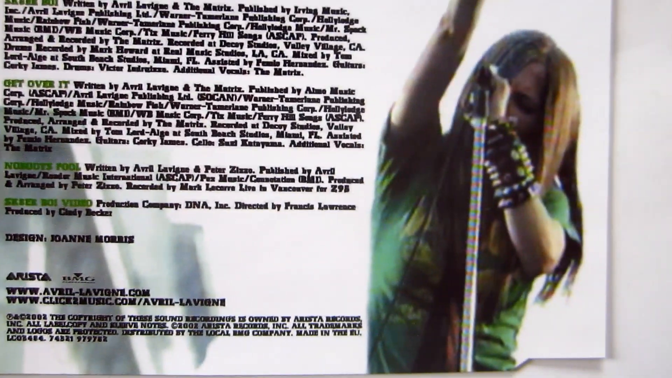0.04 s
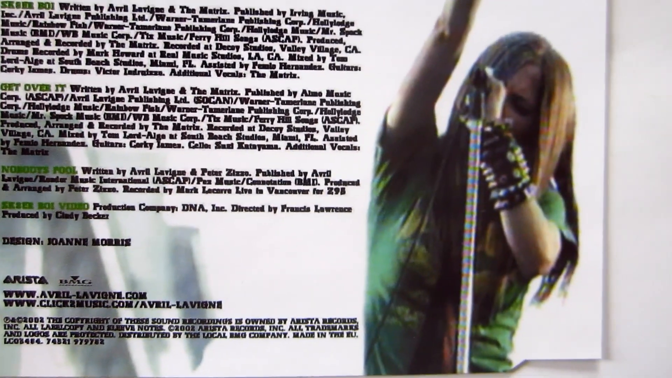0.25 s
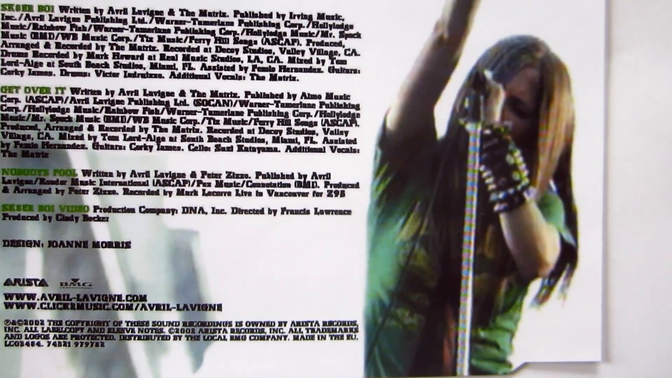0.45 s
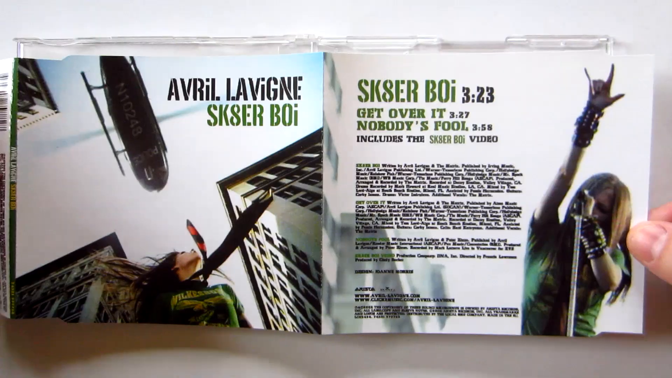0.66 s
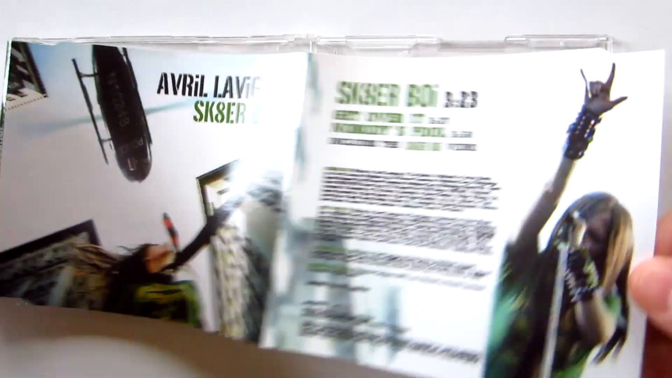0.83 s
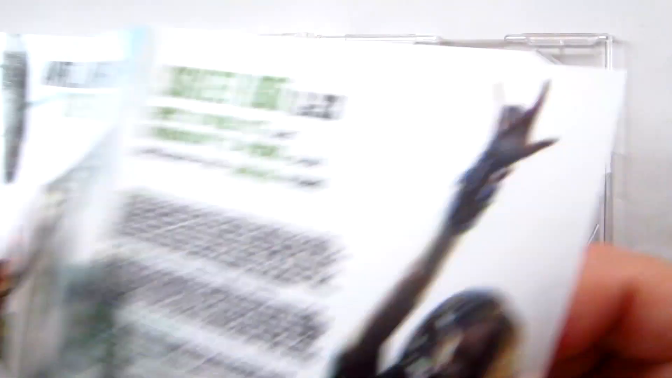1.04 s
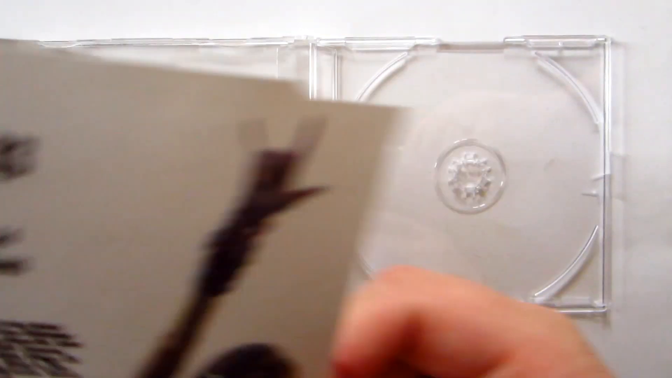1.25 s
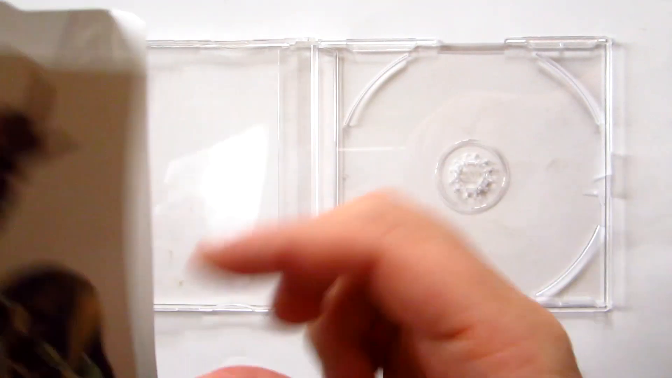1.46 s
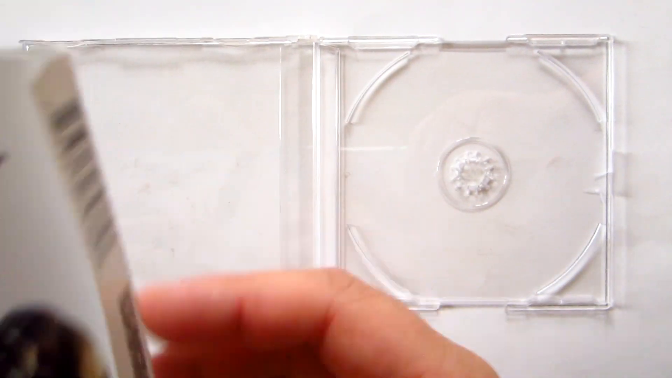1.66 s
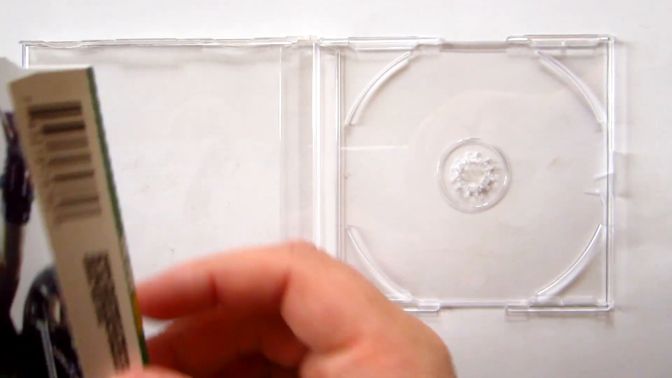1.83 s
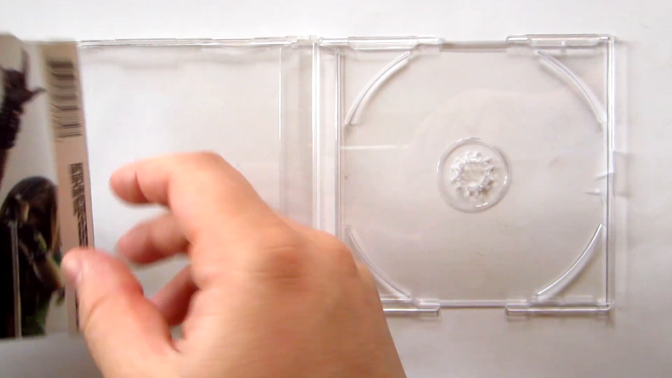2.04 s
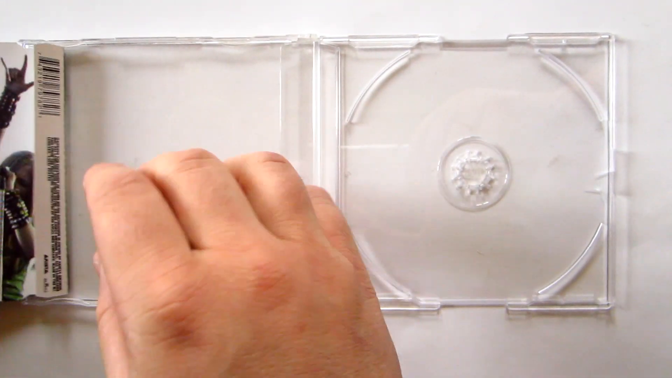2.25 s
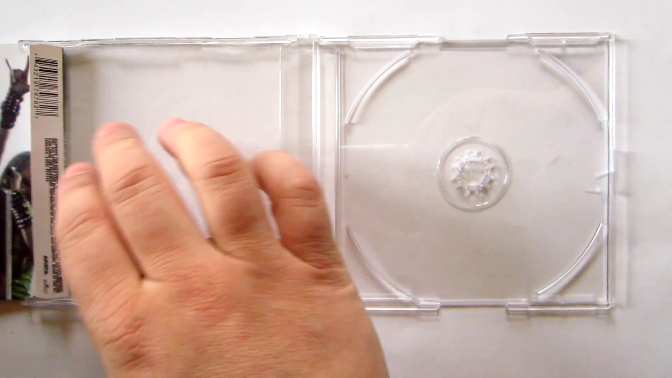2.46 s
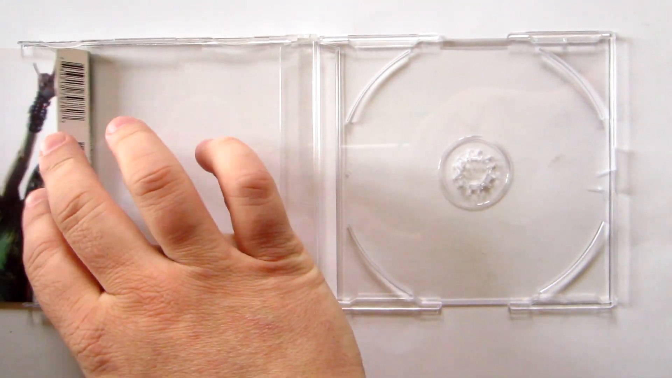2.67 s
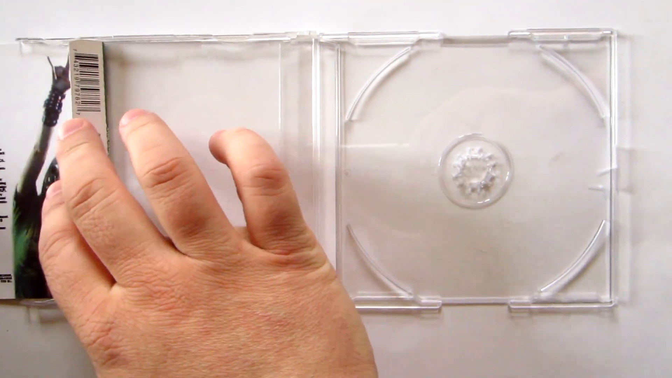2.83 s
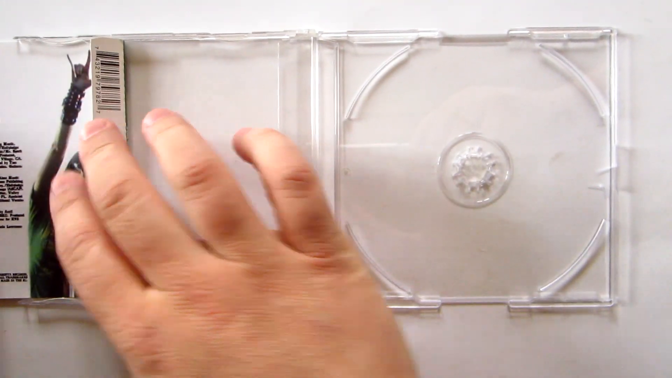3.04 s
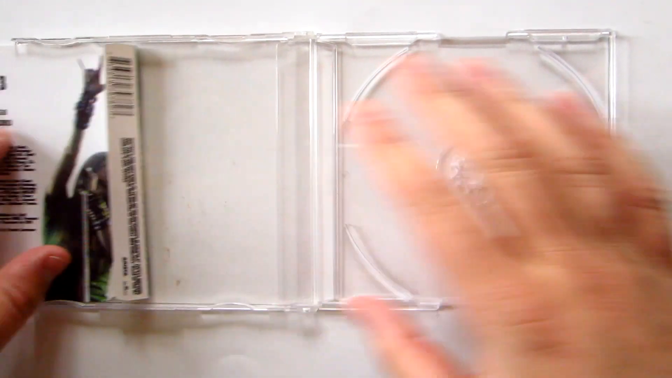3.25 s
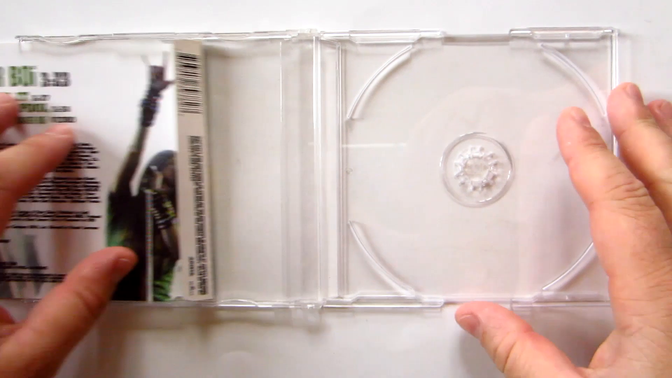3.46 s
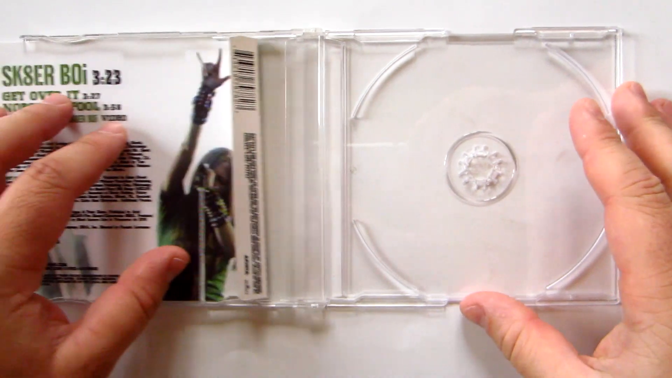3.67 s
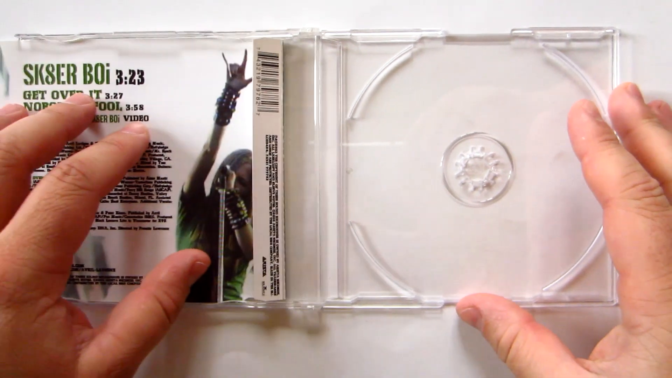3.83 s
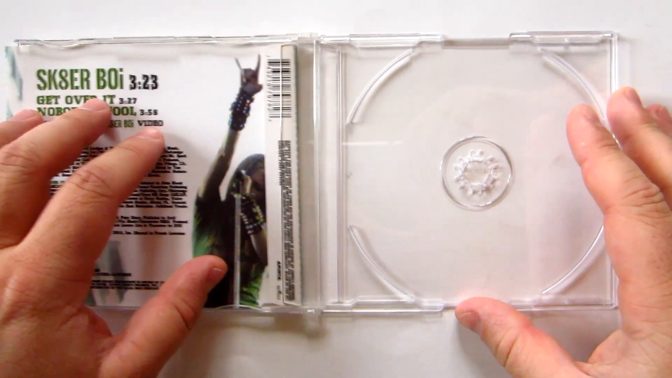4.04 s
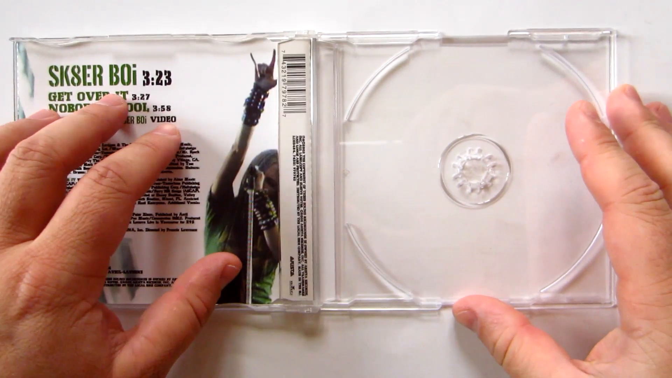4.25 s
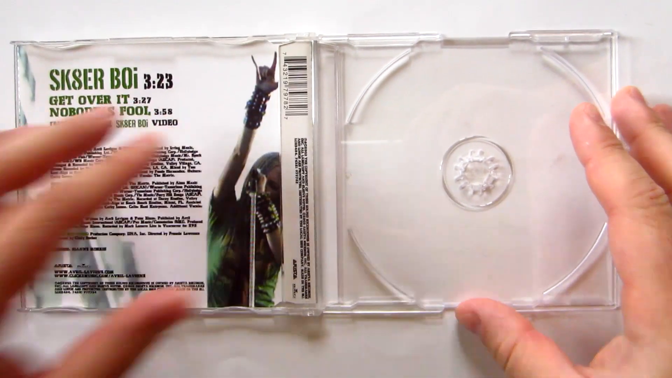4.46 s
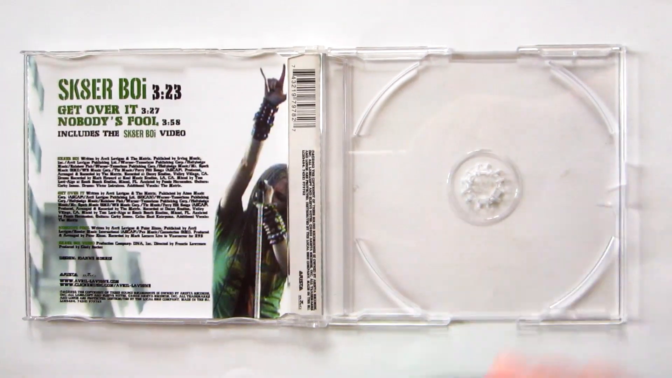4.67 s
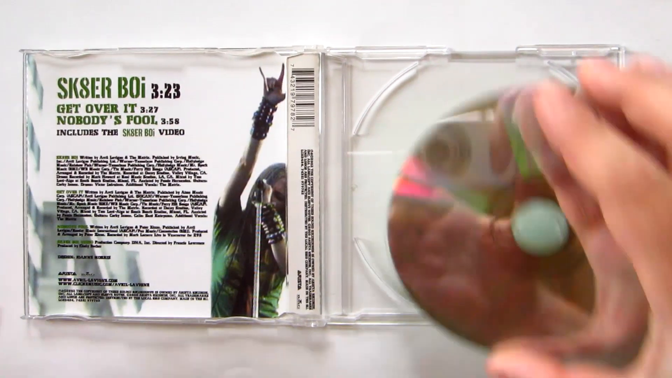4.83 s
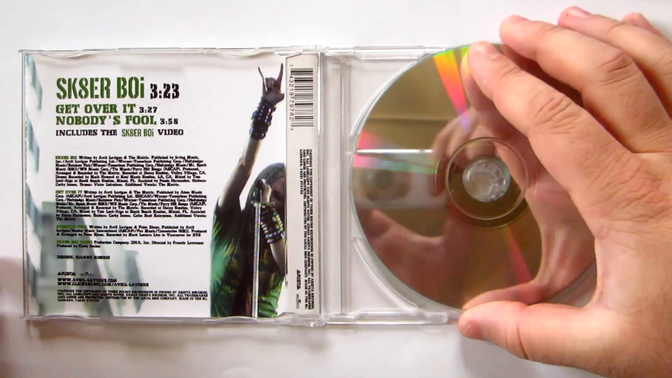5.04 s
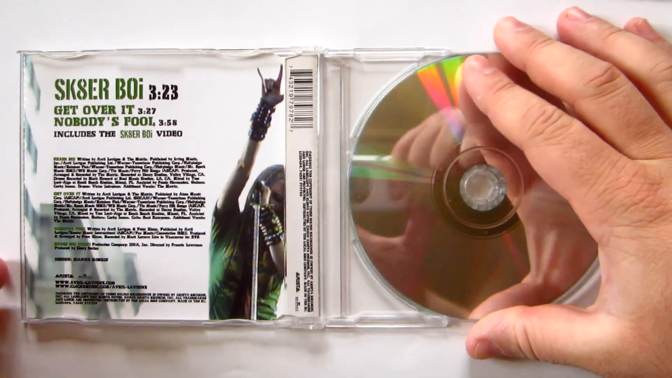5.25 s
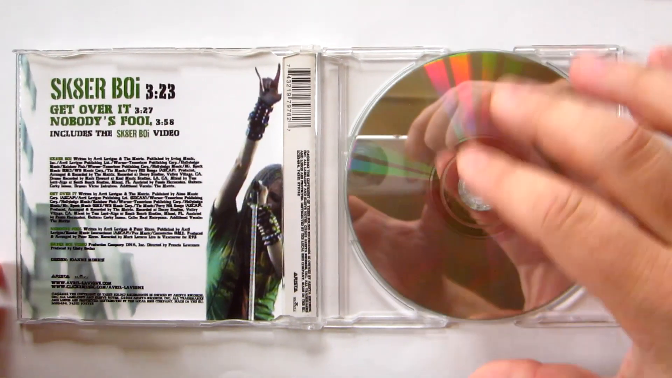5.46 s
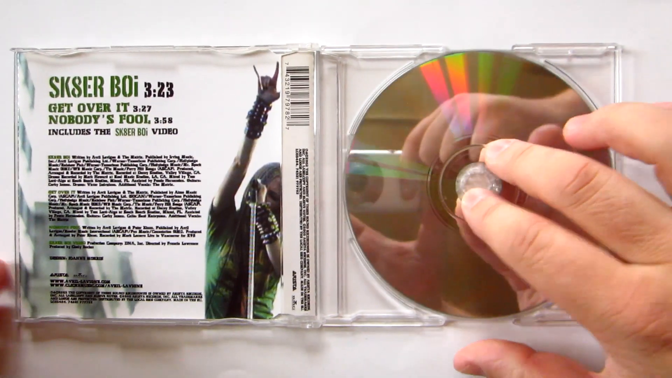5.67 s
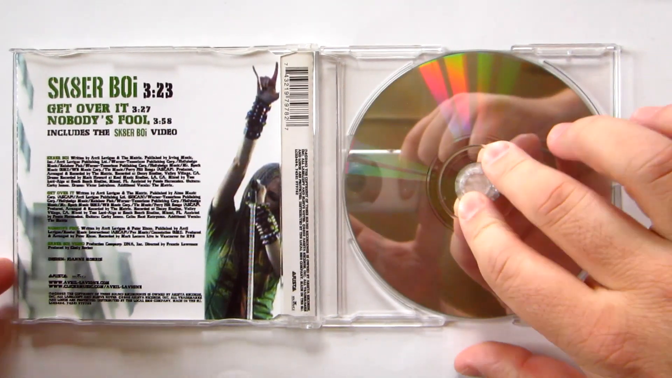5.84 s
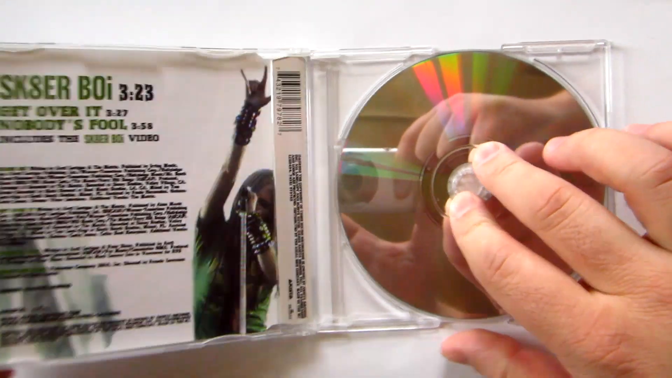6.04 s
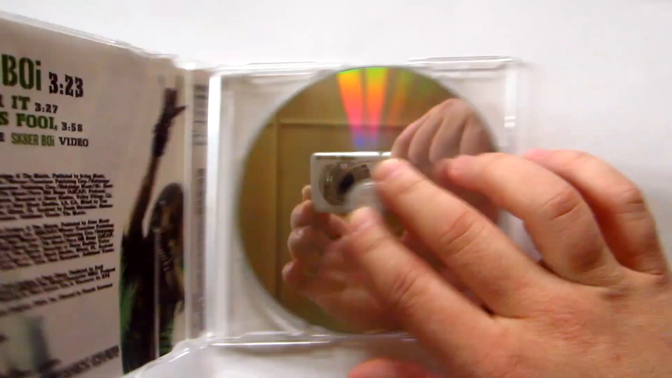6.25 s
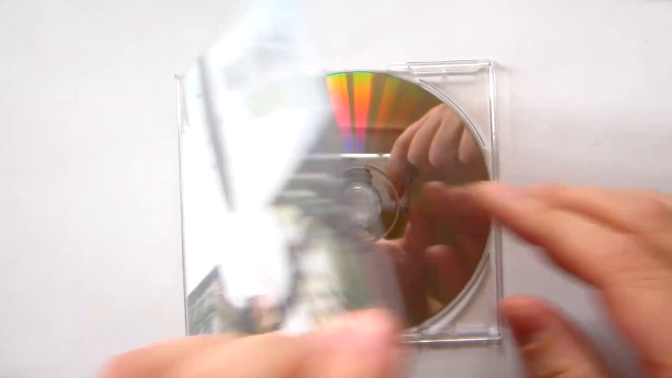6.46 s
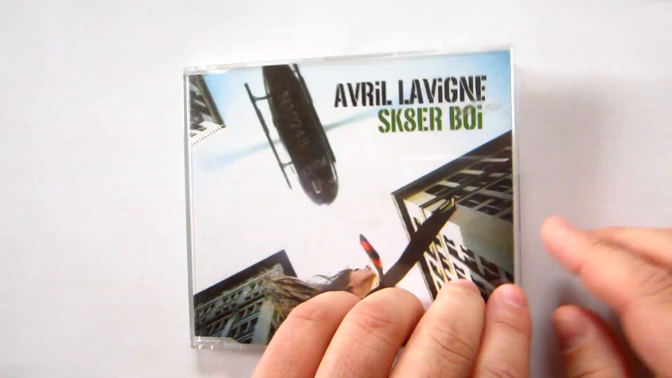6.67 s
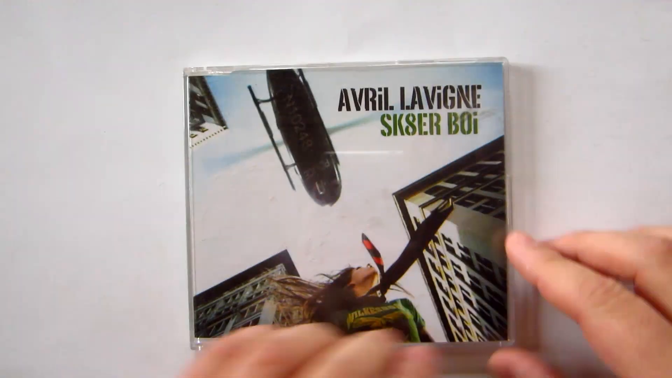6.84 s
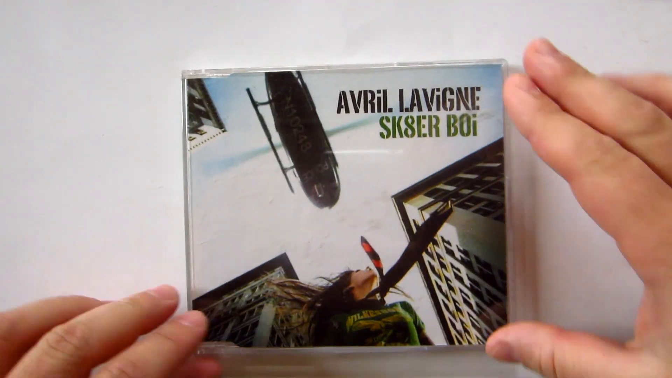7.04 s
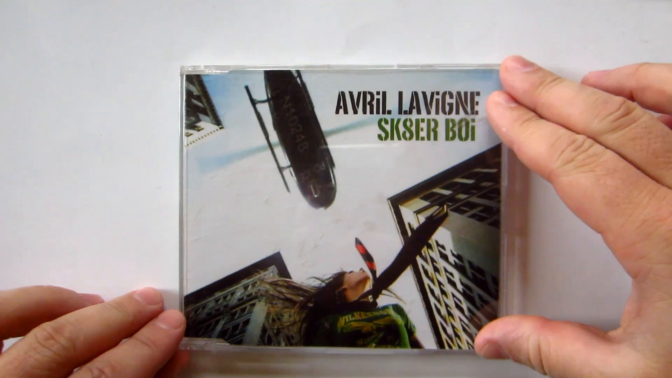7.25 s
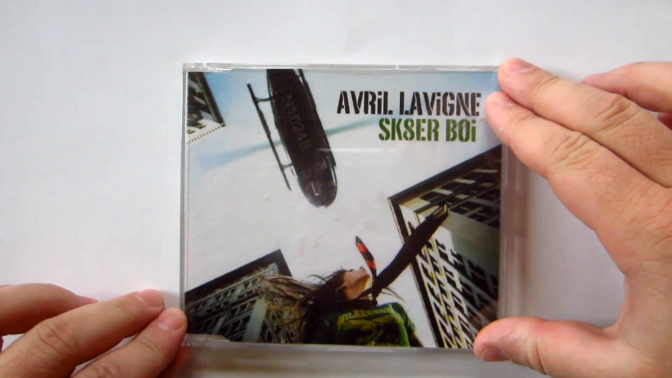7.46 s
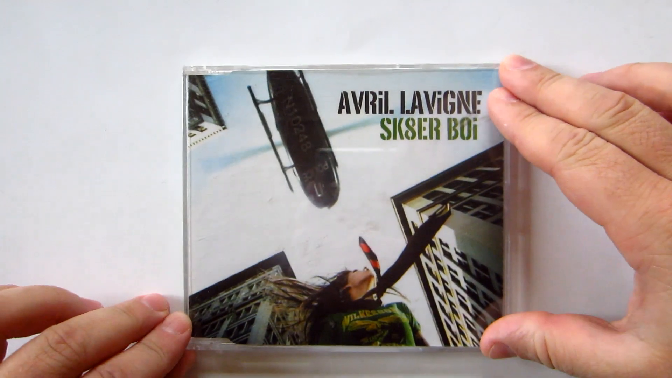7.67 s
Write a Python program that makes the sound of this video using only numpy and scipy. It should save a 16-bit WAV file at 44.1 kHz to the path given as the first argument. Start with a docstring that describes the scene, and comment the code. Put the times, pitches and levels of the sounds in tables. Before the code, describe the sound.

A quiet, dry room with faint rumble and hiss, heard close over a table. The level drops out from about 0.55 to 0.7 seconds. At 0.85-0.92 hard plastic clicks burst out, running into a rough, jerky creak until 1.05. Duller knocks come at 1.14, a short rasp at 1.25 and a click at 1.33. Soft paper rubs and small ticks continue, with clearer clicks near 2.2 and 2.28, and a brushing swell around 3.0. From 3.3 to 4.3 the insert slides in uneven, gradually duller swishes with tiny squeaks. At 5.05-5.3 the disc taps its tray in a quick cluster; a sharp press clicks at 5.7. From 6.05 to 6.4 the case scrapes round, with low thuds and a brief squeak. Bright clicks and a bump land at 6.82, light scrapes and clicks at 7.2-7.3, then a loud, crisp snap at 7.38 and a faint last rub.

```python
"""A thin plastic disc case is packed by hand on a table: filtered impulses and chatter click its shell,
friction noise drags it round as the lid swings over, and a burst of five contacts snaps the catch home.
The paper insert creaks, rasps and slides on stick-slip noise; the disc taps and scuffs its tray.
Short gliding squeaks, soft table thuds, a faint room tail, rumble and hiss lie around them.
The level drops out briefly near the start."""
import sys
import numpy as np
from scipy import signal
from scipy.fft import rfft, irfft, next_fast_len
from scipy.io import wavfile
from scipy.ndimage import uniform_filter1d

SR = 44100
rng = np.random.default_rng(int(sys.argv[2]) if len(sys.argv) > 2 else 0)


def bounce(signal):
    """Save signal as a 16-bit WAV file at the path given by the first command-line argument."""
    frames = np.transpose(np.atleast_2d(signal))
    limited = np.clip(frames, -1, 1)
    pcm = np.round(limited * 32767).astype(np.int16)
    wavfile.write(sys.argv[1], SR, pcm)


N = 339863
TIME = np.arange(N) / SR  # s
RING = TIME[:SR // 10]  # s, the time axis of one short sound

# Levels in the tables are relative; most layers also have a mix gain.
# "Knock" or "body" is the low register and "snap" or "hiss" the high one, both against the middle.

# room rumble and microphone hiss: hz, gain_db
FLOOR_TONE = [(12, -45), (20, -3.5), (60, -3), (113, -4), (270, -8), (310, -8), (542, -11.5), (1000, -15.5),
              (1220, -16), (3250, -20.5), (7730, -24.5), (16000, -35.5)]
# reverberation time of the room: hz, t60_s
ROOM_DECAY = [(200, 0.19), (2500, 0.2), (6000, 0.17), (14000, 0.22)]
# overall gain, with the dropout near the start: time_s, gain_db
DROPOUT = [(.533, 2), (.546, -41), (.6, -48), (.7, -42), (.712, 3)]
# soft bumps of hands and case on the table: start_s, level_db, resonance_hz
BUMPS = [(1.143, -40, 342), (1.383, -33.5, 107), (1.406, -44, 240), (4.633, -43, 147), (5.266, -40.5, 308),
         (6.28, -38.5, 130), (6.335, -32.5, 91), (6.405, -32.5, 89), (6.428, -37, 121), (6.823, -29.5, 240),
         (6.842, -37.5, 240), (7.384, -39, 320)]
# brief squeaks of sliding paper and plastic: middle_s, level_db, pitch_hz, glide_octaves_per_s, length_s
SQUEAKS = [(3.333, -44, 11300, 12, .008), (3.513, -47, 11200, 6, .011), (3.755, -48, 5420, 1, .017),
           (4.008, -50, 3750, -4, 0.012), (5.781, -49, 3700, -1, .012), (6.323, -36.5, 2610, -.5, .032)]

# the disc meeting the tray and its hub: start_s, level_db, knock_db, snap_db, resonance_hz
DISC_TAPS = [(5.026, -34.5, -7, -8, 3500), (5.065, -17, -7, -4.5, 4970), (5.1802, -21, -13, -9, 2680),
             (5.202, -16, -18, -15, 3000), (5.2101, -18, -8.5, -8.5, 3060), (5.266, -12.5, -8, -10.5, 3050),
             (5.2852, -19.5, -15, -9.5, 3020), (5.3285, -32.5, -5, 0, 5660), (5.6566, -32, -11, -7, 2800),
             (5.691, -13, -26, -7, 3100), (5.711, -25.5, -13, -7, 3200), (5.74, -29, -7, -9, 3720),
             (5.8288, -35.5, -9, -16, 3500)]
# the disc scuffing its tray: peak_s, rub_db, body_db, length_s
DISC_SCUFFS = [(5.258, -46.5, 0, 0.14), (5.67, -52, -16, .035), (5.715, -47.5, -1.5, .075),
               (5.781, -44, -30, 0.039)]
# colour of disc on tray: hz, gain_db
DISC_TONE = [(88, -58), (150, -24), (589, -26), (1260, -7), (1900, -7.5), (3040, 1.5), (4160, -8.5),
             (5050, -10), (6260, -13.5), (6770, -20), (10400, -26.5), (11700, -28), (16000, -49)]
# resonances of the tray: centre_hz, width_hz, gain_db
TRAY_MODES = [(1380, 150, -2), (2200, 180, -18), (2760, 140, -1), (3200, 630, 10), (3700, 290, -19),
              (4400, 400, -17)]

# the insert sticking and slipping on the lid: time_s, level_db
CREAK_LEVEL = [(.932, -33), (.944, -24), (.975, -23.5), (1.01, -24.5), (1.034, -24), (1.05, -40),
               (1.07, -50)]
# the insert's edge rasping past a tab: time_s, level_db
RASP_LEVEL = [(1.2505, -41), (1.252, -27), (1.267, -29.5), (1.283, -32), (1.293, -31), (1.298, -49)]
# strokes of paper on plastic: peak_s, rub_db, body_db, length_s
PAPER_STROKES = [(.83, -50.5, -4, 0.1), (1.075, -47, -1.5, 0.1), (1.15, -42, 10.5, 0.044),
                 (1.185, -45, -1, 0.15), (1.305, -42, -7, 0.1), (1.375, -61.5, 8.5, .13),
                 (1.785, -61, -14, 0.067), (2.045, -55.5, -3, 0.16), (2.21, -44, -2.5, 0.051),
                 (2.3, -51.5, -2, 0.17), (2.55, -53.5, -6, 0.33), (2.645, -51, -8, .05),
                 (2.765, -50.5, -13, 0.14), (2.858, -42, -10, .13), (2.995, -36.5, -14.5, 0.083)]
# the insert pushed home under the tabs: time_s, rub_db
SLIDE_HOME = [(3.27, -78), (3.312, -46), (3.422, -45), (3.482, -56), (3.53, -43.5), (3.576, -52),
              (3.67, -48.5), (3.728, -56), (3.752, -45.5), (3.818, -55), (3.894, -54.5), (3.9, -47),
              (3.924, -60), (4.004, -45.5), (4.05, -62.5), (4.112, -36), (4.126, -42.5), (4.32, -66)]
# colours of the creak, the rasp and sliding paper: hz, gain_db
CREAK_TONE = [(88, -74), (150, -37), (291, -28), (354, -6.5), (475, -31.5), (566, -10), (888, -16.5),
              (1290, -7), (1530, -23), (2270, 2.5), (2760, 0.5), (8560, -30), (14500, -36), (16000, -48)]
RASP_TONE = [(120, -67), (200, -42), (491, -25), (722, -15.5), (3560, -11.5), (3830, 1.5), (4120, -16),
             (4520, -7), (7140, -16.5), (13100, -18.5), (16000, -39)]
PAPER_TONE = [(180, -61), (300, -12.5), (455, -15.5), (713, -12), (1080, -8.5), (1480, -11), (1900, -4.5),
              (3290, -2), (3700, 1.5), (5430, -1.5), (7320, -6), (11500, -6.5), (16000, -19)]

# hard contacts on the case: start_s, level_db, knock_db, snap_db, resonance_hz
CASE_CLICKS = [(0.8444, -23.5, -14, -21, 2150), (.869, -20.5, -10, -17, 1800), (.877, -18, -9, -12, 1590),
               (0.9054, -11, -13, -22, 3570), (0.9117, -3, -15, -14.5, 3600), (0.9157, -9.5, -6, -16, 1380),
               (1.135, -27, 3, -11, 1380), (1.1435, -20, 8, -10, 1230), (1.1525, -21.5, 5, -8, 750),
               (1.266, -14.5, -15, -21, 3970), (1.3338, -23, -9, -0.5, 3850), (1.9736, -37.5, -2, -1, 3230),
               (2.0102, -37.5, -2, -7, 4030), (2.1945, -16.5, -6, -4, 4100), (2.272, -31, -9, -13, 4520),
               (2.2812, -19, -1, -5, 4840), (2.5767, -29, -5, -10, 2410), (2.6348, -33.5, -9, -2, 4350),
               (2.7937, -25.5, -8, 5, 2760), (2.89, -25, -11.5, -15, 4150), (3.0981, -33.5, -2, -2, 4400),
               (3.6625, -30, -25, -7, 3680), (3.9009, -30, -17, -10, 4150), (4.5595, -33, -4, -1, 2540),
               (6.8209, -16, -3, 3.5, 5250), (6.8252, -16, -7.5, -11, 2200), (6.8345, -21, -9, 2, 5050),
               (7.2604, -33.5, -10, -12, 2200), (7.2909, -18, -11, -8, 5920)]
# the hardest slips of the creaking insert: start_s, level_db
CREAK_SLIPS = [(0.9454, -11), (.9487, -12), (0.962, -14.5), (0.9714, -11), (0.9887, -13), (0.9945, -9.5),
               (1.0023, -11.5), (1.0117, -10.5)]
# the catch snapping home: start_s, level_db, knock_db, snap_db, base_t60_s, resonance_hz
CATCH_SNAP = [(7.3788, -13, -8, -14, 0.035, 5500), (7.381, -14, -6, -2, 0.012, 4800),
              (7.3828, -3, -11, -9, 0.0058, 3880), (7.3842, -2, -18, -12.5, 0.0081, 2370),
              (7.3857, -7.5, -12, -15, 0.018, 1950)]
# the case shifted on the table: peak_s, rub_db, body_db, length_s
CASE_DRAGS = [(6.595, -51, -6, 0.2), (6.75, -53.5, -6, 0.12), (6.795, -40.5, -6.5, 0.054),
              (6.84, -49, 0, 0.075), (7.212, -42, -15.5, 0.067), (7.305, -50, -13, 0.24),
              (7.64, -53.5, -4, 0.12)]
# the case pulled round as the lid swings over: time_s, rub_db, body_db, hiss_db
LID_SWING = [(6.02, -63.5, 6, -10), (6.064, -46.5, -14, -7.5), (6.142, -48, -14, -6),
             (6.146, -49.5, -15, 3.5), (6.176, -37.5, -9.5, -5), (6.234, -34, -13.5, -2.5),
             (6.3, -35.5, -10, -3), (6.304, -33, -15, -7), (6.352, -34.5, -11, -7), (6.42, -56, -1, -11)]
# colours of the clicks, the catch and the dragged case: hz, gain_db
CLICK_TONE = [(88, -36), (150, -15.5), (291, -10.5), (475, -18.5), (702, 2), (1390, 4.5), (2920, -2.5),
              (3550, -1), (4950, -3.5), (5360, -8.5), (7770, -8), (12200, -18.5), (14200, -23),
              (16000, -45)]
CATCH_TONE = [(150, -25), (400, -23), (750, -21), (1150, -5.5), (1500, -13), (2000, -2), (3600, -3.5),
              (5500, -3.5), (10000, -13), (16000, -25)]
DRAG_TONE = [(180, -51), (300, -18), (667, -13), (814, -6), (1390, -2), (1580, -4.5), (2570, -1),
             (3400, -6), (5430, -6), (10000, -6.5), (13500, -11), (16000, -25)]
# resonances of the lid, the closed case and the shell under rubbing: centre_hz, width_hz, gain_db
LID_MODES = [(394, 28, -16.5), (764, 35, -9), (1276, 59, -4), (1590, 16, -13), (2520, 29, 0),
             (2760, 38, -1), (3210, 53, -3), (3400, 18, -7.5), (3780, 33, -0.5), (4360, 68, -14.5),
             (4970, 32, -13.5), (5200, 47, -14)]
CLOSED_MODES = [(1120, 120, -10), (1950, 260, -5), (2370, 84, -12), (2950, 83, -15), (3600, 130, -10),
                (4970, 55, -7), (4840, 58, -13), (5530, 63, -9), (5970, 120, -7)]
SHELL_MODES = [(766, 16, 8), (1470, 157, -22.5), (2186, 85, -22), (2545, 206, 7), (2920, 18, -23),
               (4530, 83, -20), (5500, 89, -6), (6470, 165, -27)]

FLOOR_DB, TOP_HZ = -58, 16000  # rumble and hiss before the output gain; upper band limit
BUMP_T60_S = 0.069
DISC_T60_S = .018  # base decay of every tap
# firm contacts damp themselves: base decay of a 0 dB click, and the drop in level that doubles it
CLICK_T60_S, T60_DOUBLES_DB = 0.014, 22.5
# faint ticks while the fingers work on the insert
TICK_START_S, TICK_END_S, TICK_DB = 0.62, 3.1, -44.5
TICK_KNOCK_DB, TICK_SNAP_DB, TICK_HZ = -10, 1, 3200
SLIP_KNOCK_DB, SLIP_SNAP_DB, SLIP_T60_S, SLIP_HZ = -17.5, -21.5, 0.05, 3200
RISE_SHARE = 0.48  # part of a stroke spent swelling; its length runs from -20 dB up and back to -20 dB
SLIDE_BODY_DB, SLIDE_HISS_DB, SLIDE_DULLS_DB_PER_S = -14.5, -0.5, 10.5


def amp(db):
    """Decibels to gain."""
    return 10 ** (np.asarray(db) / 20)


def unit(x):
    """Scaled to rms 1."""
    return x / np.sqrt(np.mean(x ** 2) + 1e-20)


def along(points, hz):
    """Values read off (hz, value) points on a log frequency axis."""
    f, v = np.transpose(points)
    return np.interp(np.log(hz + 1), np.log(f + 1), v)


def gains(rows):
    """A gain per sample for each dB column, at -140 dB outside the rows."""
    s, *cols = np.transpose(rows)
    return np.array([amp(np.interp(TIME, s, c, left=-140, right=-140)) for c in cols])


def filtered(x, response):
    """x times a response of frequency."""
    m = next_fast_len(len(x) + 2048)
    return irfft(rfft(x, m) * response(np.fft.rfftfreq(m, 1 / SR)), m)[:len(x)]


def coloured(x, gain):
    """Minimum-phase filter with the given gain, so that attacks stay sharp."""
    def response(hz):
        cepstrum = irfft(np.log(np.maximum(gain(hz), 1e-6)))
        # fold the cepstrum onto positive time to make the filter causal
        cepstrum[1:len(cepstrum) // 2] *= 2
        cepstrum[len(cepstrum) // 2 + 1:] = 0
        return np.exp(rfft(cepstrum))
    return filtered(x, response)


def resonate(x, modes):
    """x through parallel resonances of alternating sign."""
    def response(f):
        total = 0
        for k, (centre, width, db) in enumerate(modes):
            damping = 1j * f * width
            total = total + (-1) ** k * amp(db) * damping / (centre * centre - f * f + damping)
        return total
    return filtered(x, response)


def ringing(x, modes, ring_db):
    """x plus the ring that it excites in a plastic part, at the same total power."""
    return np.std(x) * unit(unit(x) + amp(ring_db) * unit(resonate(x, modes)))


def registers(hz, low_hz=1450, high_hz=6000):
    """Smooth weights of the middle, low and high registers."""
    low = 1 / (1 + (hz / low_hz) ** 6)
    high = 1 - 1 / (1 + (hz / high_hz) ** 6)
    return 1 - low - high, low, high


def slips(rate, spread_db):
    """Stick-slip impulses of uneven spacing, size and direction, rms 1; rate is slips a second."""
    gap, size, side = rng.random((30000, 3)).T
    at = (np.cumsum(.25 + 1.5 * gap) * SR / rate).astype(int)
    kicks = amp(spread_db * size) * np.sign(side - .5)
    return unit(np.bincount(at[at < N], kicks[at < N], N))


def friction(rate, spread_db, smooth_db):
    """Slips on top of the smooth hiss of fine roughness."""
    return unit(slips(rate, spread_db) + amp(smooth_db) * rng.standard_normal(N))


def wandering(x, depth_db, size=(5, 9)):
    """The colour of a rub shifts in patches of frequency and time as the contact point moves."""
    z = signal.stft(x, nperseg=512)[2]
    field = uniform_filter1d(rng.standard_normal(z.shape), size[0], 0)
    field = uniform_filter1d(field, size[1], 1)
    return unit(signal.istft(z * amp(depth_db * unit(field)), nperseg=512)[1][:N])


def stroked(strokes, hiss_db, rise_power, fall_power):
    """Power in the middle, low and high registers for strokes that all swell and fade by one shape."""
    power = np.zeros((3, N))
    for s, db, body_db, length in strokes:
        near = np.abs(TIME - s) < .4
        u = (TIME[near] - s) / length
        rise = np.abs(u / RISE_SHARE) ** rise_power
        fall = np.abs(u / (1 - RISE_SHARE)) ** fall_power
        away = np.where(u < 0, rise, fall)
        power[:, near] += np.outer(amp([0, body_db, hiss_db]), amp(db - 20 * away)) ** 2
    return power


def pushed(rows):
    """Power in the same registers for one long push: time_s, rub_db, body_db, hiss_db."""
    return gains([(s, db, db + body_db, db + hiss_db) for s, db, body_db, hiss_db in rows]) ** 2


def rubbing(power, tone, grain):
    """Friction that follows the power of the rub in each register."""
    out = 0
    for k, p in enumerate(power):
        band = filtered(grain, lambda f: amp(along(tone, f)) * registers(f)[k])
        out = out + np.sqrt(p) * unit(band)
    return out


def contacts(rows, tone, chatter_db, stretch, focus_db, q):
    """Each contact is a sharp push and a few ms of chatter; stretch scales its decay in each register."""
    out = np.zeros(N + SR)
    for s, db, knock_db, snap_db, t60, hz in rows:
        # the spot that is struck favours one broad resonance
        spot = lambda f: amp(along(tone, f) + focus_db / (1 + (q * (f / hz - 1)) ** 2))
        hit = 0
        for k, share in enumerate(amp([0, knock_db, snap_db])):
            decay = amp(-60 * RING / max(t60 * stretch[k], .001))
            chatter = rng.standard_normal(len(RING)) * decay
            blow = unit(RING == 0) + amp(chatter_db) * unit(chatter)
            hit = hit + share * unit(coloured(blow, lambda f: spot(f) * registers(f)[k]))
        out[round(s * SR):][:len(RING)] += amp(db) * hit / np.linalg.norm(hit)
    return out[:N]


def floor():
    """Room rumble and microphone hiss as shaped noise, with a thin whistle of narrow-band noise."""
    hiss = unit(filtered(rng.standard_normal(N), lambda f: amp(along(FLOOR_TONE, f))))
    whistle = unit(resonate(rng.standard_normal(N), [(7860, 140, 0)]))  # centre_hz, width_hz, gain_db
    return amp(FLOOR_DB) * hiss + amp(-78) * whistle


def room(x, delay_s=.007):
    """The walls answer after a short gap with a noise tail whose bands die at their own rates."""
    hz, t, z = signal.stft(rng.standard_normal(SR // 2), SR, nperseg=256)
    decay = amp(-60 * t / along(ROOM_DECAY, hz)[:, None])
    tail = signal.istft(z * decay, SR, nperseg=256)[1]
    tail = np.pad(tail / np.linalg.norm(tail), (round(delay_s * SR), 0))
    return signal.fftconvolve(x, tail)[:N]


def table(attack_s=0.0011, q=2.1):
    """Soft bumps of hands and case thud in the table top: short noise pushes through two broad modes."""
    out = np.zeros(N + SR)
    for s, db, hz in BUMPS:
        swell = 1 - np.exp(-RING / attack_s)
        push = rng.standard_normal(len(RING)) * swell * amp(-60 * RING / BUMP_T60_S)
        top = lambda f: amp(-11.0) / (1 + ((f - 250) / 80) ** 2)  # the table top's own mode
        spot = lambda f: 1 / (1 + (q * (f / hz - 1)) ** 2)
        thud = coloured(push, lambda f: (top(f) + spot(f)) * f / (f + 70))
        out[round(s * SR):][:len(RING)] += amp(db - 4.5) * thud / np.abs(thud).max()
    return out[:N]


def squeaks():
    """For a moment the slips fall into step and give a rough gliding tone: a sine of wavering pitch."""
    out, t = np.zeros(N), RING - RING.mean()
    for s, db, hz, glide, length in SQUEAKS:
        waver_hz = 220 * unit(uniform_filter1d(rng.standard_normal(len(t)), size=40))
        phase = 2 * np.pi * np.cumsum(hz * 2 ** (glide * t) + waver_hz) / SR
        bell = np.exp(-(t / length) ** 2)
        out[round((s + t[0]) * SR):][:len(t)] += amp(db) * bell * unit(np.sin(phase))
    return out


def disc():
    """The disc taps and scuffs the tray: short contacts and friction that ring the tray's modes."""
    hits = [(*tap, DISC_T60_S, hz) for *tap, hz in DISC_TAPS]
    taps = contacts(hits, DISC_TONE, chatter_db=8.5, stretch=[1, 1.1, .8], focus_db=10, q=10.4)
    grain = wandering(friction(rate=790, spread_db=14, smooth_db=-1), depth_db=2.5)
    power = stroked(DISC_SCUFFS, hiss_db=-5.5, rise_power=0.6, fall_power=0.67)
    scuff = rubbing(power, DISC_TONE, grain)
    return ringing(amp(9.5) * taps + amp(-2.5) * scuff, TRAY_MODES, ring_db=-15.0)


def insert():
    """Stick-slip paper creaks on the lid, rasps past a tab and slides home, duller the further in it gets."""
    jerks = friction(rate=300, spread_db=9.0, smooth_db=-2)
    paper_creak = unit(coloured(jerks, lambda f: amp(along(CREAK_TONE, f))))
    creak = amp(-5.0) * paper_creak + amp(-9.0) * unit(resonate(jerks, LID_MODES))

    scrape = wandering(friction(rate=1700, spread_db=23, smooth_db=1.5), depth_db=4.0)
    rasp = unit(filtered(scrape, lambda f: amp(along(RASP_TONE, f))))

    grain = wandering(friction(rate=700, spread_db=22, smooth_db=0.5), depth_db=3.0)
    start_s = SLIDE_HOME[0][0]
    home = pushed([(s, db, SLIDE_BODY_DB, SLIDE_HISS_DB - SLIDE_DULLS_DB_PER_S * (s - start_s))
                   for s, db in SLIDE_HOME])
    strokes = stroked(PAPER_STROKES, hiss_db=-4.5, rise_power=1.06, fall_power=0.76)
    power = strokes + amp(0.5) ** 2 * home
    slide = ringing(rubbing(power, PAPER_TONE, grain), SHELL_MODES, ring_db=-10.5)
    return gains(CREAK_LEVEL)[0] * creak + gains(RASP_LEVEL)[0] * rasp + amp(-3) * slide


def ticks(count=7, spread_db=3):
    """Faint finger contacts at chance moments, each on a spot of its own."""
    rows = []
    for when, force, spot in rng.random((count, 3)):
        s = TICK_START_S + (TICK_END_S - TICK_START_S) * when
        db = TICK_DB + spread_db * (2 * force - 1)
        rows.append((s, db, TICK_KNOCK_DB, TICK_SNAP_DB, TICK_HZ * 2 ** (spot - .5)))
    return rows


def case():
    """The shell clicks under fingers and slipping insert, scrapes over the table and snaps shut."""
    hits = [(s, db, knock, snap, CLICK_T60_S * 2 ** (-db / T60_DOUBLES_DB), hz)
            for s, db, knock, snap, hz in CASE_CLICKS + ticks()]
    hits += [(s, db, SLIP_KNOCK_DB, SLIP_SNAP_DB, SLIP_T60_S, SLIP_HZ) for s, db in CREAK_SLIPS]
    clicks = contacts(hits, CLICK_TONE, chatter_db=4, stretch=[1, 1.3, .85], focus_db=10.5, q=5.7)
    clicks = ringing(clicks, LID_MODES, ring_db=-11.5)

    catch = contacts(CATCH_SNAP, CATCH_TONE, chatter_db=2, stretch=[1, 1.3, .8], focus_db=11.0, q=4.8)
    catch = ringing(catch, CLOSED_MODES, ring_db=-27)

    grain = wandering(friction(rate=900, spread_db=18, smooth_db=5), depth_db=3.04)
    shifts = stroked(CASE_DRAGS, hiss_db=-11, rise_power=1.6, fall_power=1.27)
    power = shifts + amp(1.5) ** 2 * pushed(LID_SWING)
    drag = ringing(rubbing(power, DRAG_TONE, grain), SHELL_MODES, ring_db=-5)
    return amp(10.5) * clicks + amp(8.5) * catch + amp(-4.0) * drag


def scene():
    """Everything happens on the table, close to the microphone, over a faint room tail and the floor."""
    near = insert() + case() + disc() + squeaks() + table()
    return (near + amp(-16.0) * room(near) + floor())[None]


def record(dry):
    """The level drops out briefly, the loudest peaks are rounded off and a steep low-pass ends the treble."""
    gated = dry[0] * amp(np.interp(TIME, *np.transpose(DROPOUT)))
    rounded = gated / (1 + np.abs(gated / .92) ** 8) ** (1 / 8)  # bends towards a ceiling of 0.92
    return filtered(rounded, lambda hz: 1 / (1 + (hz / TOP_HZ) ** 120))[None]


dry = scene()
out = record(dry)
bounce(out)
```